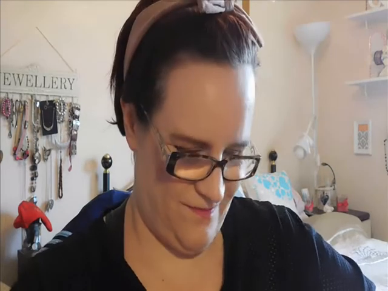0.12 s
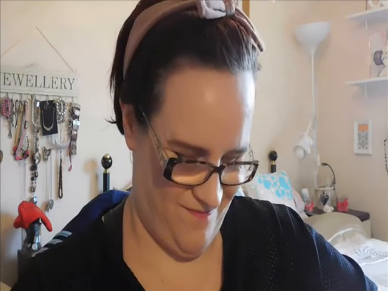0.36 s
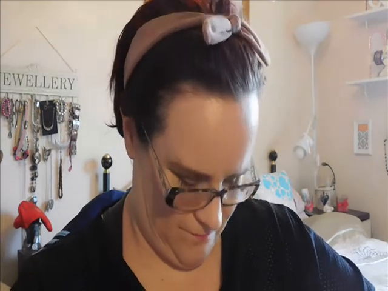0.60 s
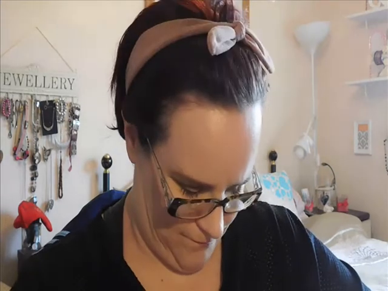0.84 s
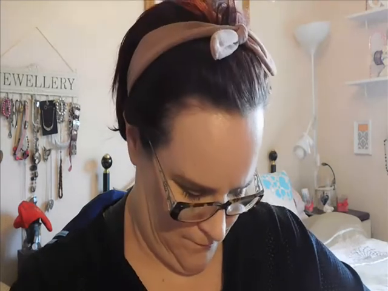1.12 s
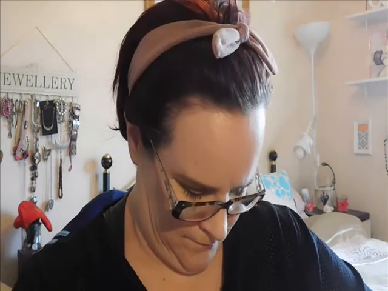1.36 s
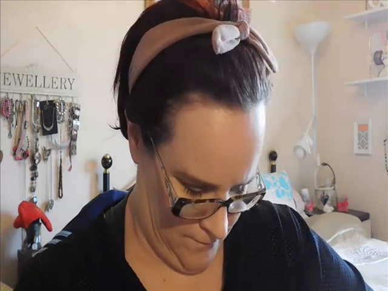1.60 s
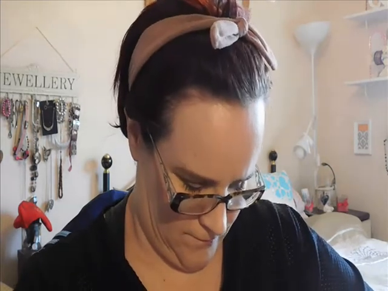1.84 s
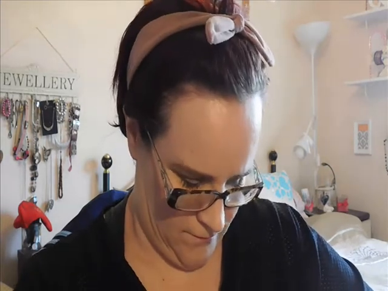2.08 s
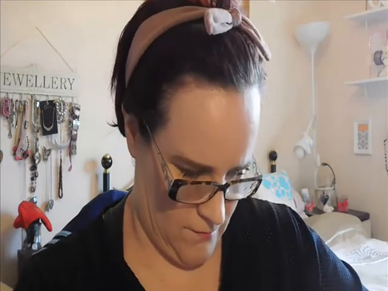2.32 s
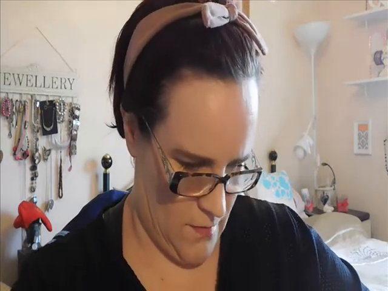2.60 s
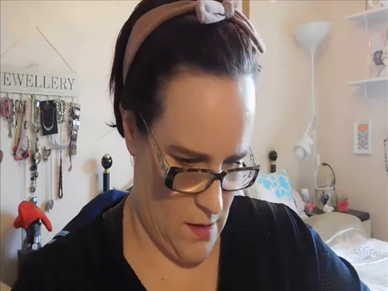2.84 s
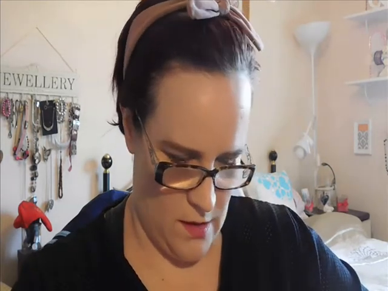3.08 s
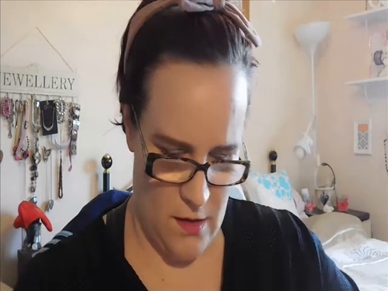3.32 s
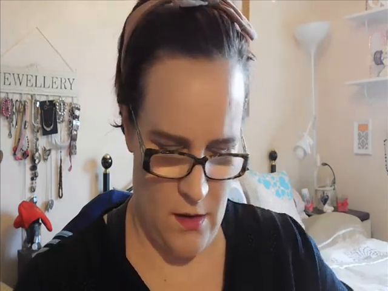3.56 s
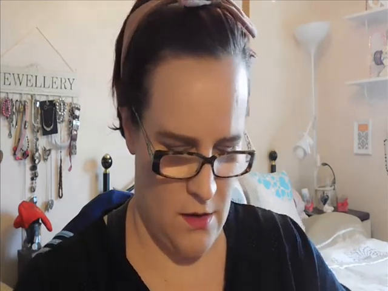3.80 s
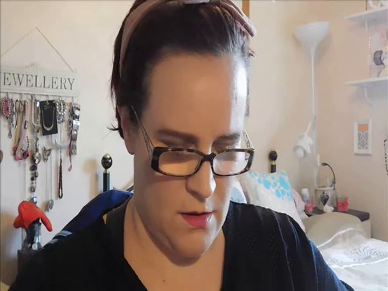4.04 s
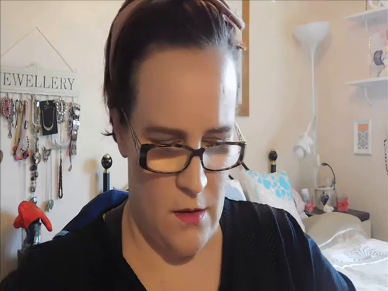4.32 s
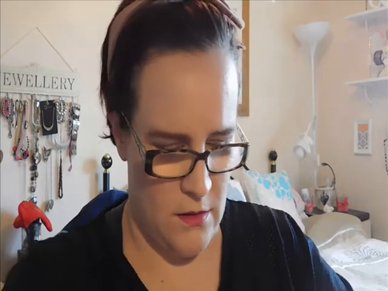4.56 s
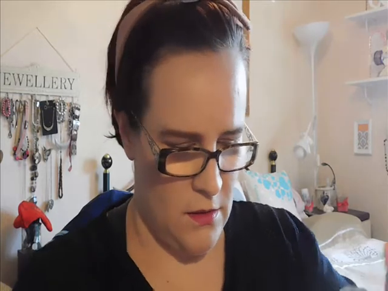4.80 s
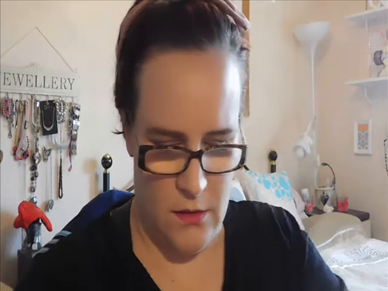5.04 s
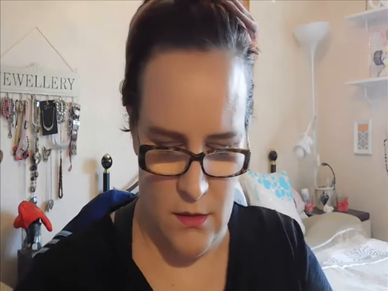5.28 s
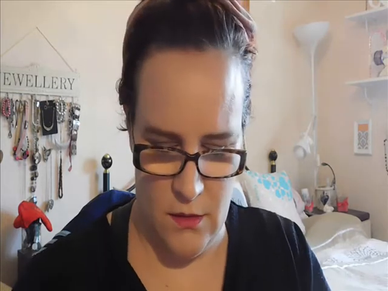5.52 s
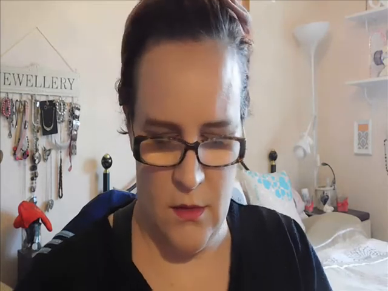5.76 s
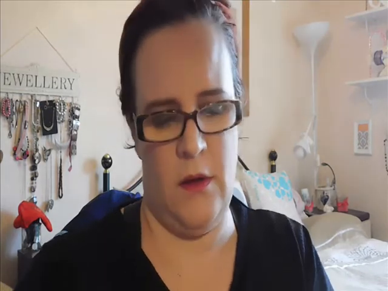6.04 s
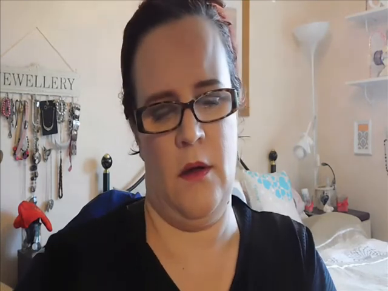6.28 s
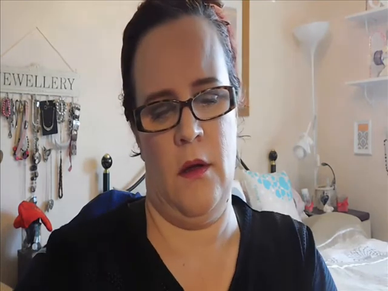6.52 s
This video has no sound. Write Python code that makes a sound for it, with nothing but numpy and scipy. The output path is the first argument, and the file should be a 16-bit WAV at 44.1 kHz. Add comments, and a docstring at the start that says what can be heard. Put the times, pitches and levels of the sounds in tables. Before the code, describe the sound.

Unseen fingers work open a small crisp pack, snapping folds and knocking flaps in uneven bursts, close up in a quiet furnished room.

```python
"""Opening a small card-and-plastic package

Hands out of sight open a small package in a quiet, soft bedroom. Folds snap and flaps knock:
stuttering bursts of slips ring the hollow pack, each at its own pitch, with a thump and a crack.
Between them fingers rustle: clumped tiny slips, all heard through a dull card and a bright foil filter.
First echoes and a short tail answer; filtered noise gives the microphone hiss and the low rumble."""
import sys
import numpy as np
from scipy import signal
from scipy.fft import rfft, irfft
from scipy.io import wavfile
from scipy.ndimage import uniform_filter1d

SR = 44100
rng = np.random.default_rng(int(sys.argv[2]) if len(sys.argv) > 2 else 0)


def natural_amplitude(level_db):
    """Convert a level in decibels to a linear amplitude factor, elementwise."""
    exponent = np.asarray(level_db, float) / 20
    return 10 ** exponent


def wrap_up_sound(samples):
    """Save the sound to the file named by the first command line argument, as 16-bit audio."""
    columns = np.atleast_2d(samples).T
    # keep every value between -1 and 1, then stretch to whole-number steps
    tamed = np.clip(columns, -1, 1)
    steps = np.round(tamed * 32767).astype(np.int16)
    wavfile.write(sys.argv[1], SR, steps)


N = 292824  # length of the scene [samples]
TAPS = 4096  # transform length for filters and snaps [samples]

# Low rumble of the house: (time [s], level [dB])
RUMBLE_LEVEL = [(0.0, -69), (1.0, -67), (1.15, -66), (2.1, -63.5), (2.5, -70), (6.64, -68.5)]
# Colour of the microphone hiss and room air: (frequency [Hz], relative density [dB per Hz])
HISS_COLOUR = [(47, -24), (80, -3), (200, -2), (261, -2.5), (665, -1), (1040, -2), (1860, -2), (2370, -5),
               (3790, -9.5), (6470, -18), (15100, -20.5), (16500, -58)]
# Left-right likeness of the hiss: (frequency [Hz], likeness [0-1])
HISS_LIKENESS = [(60, 0.73), (240, 0.042), (950, 0.044), (3770, 0.022), (15000, 0.022)]
# Decay of the room tail: (frequency [Hz], time to fall 60 dB [s])
ROOM_DECAY = [(250, 0.22), (660, 0.17), (1740, 0.19), (4590, 0.25), (12100, 0.19)]
# Left-right likeness of the room tail: (frequency [Hz], likeness [0-1])
ROOM_LIKENESS = [(100, 0.75), (600, 1), (1500, 0.32), (3000, 0.057), (8000, 0.024)]
# Strength of the room tail: (frequency [Hz], level [dB])
ROOM_STRENGTH = [(150, -16.5), (600, -0.5), (2000, -2.5), (5000, -8), (12000, -3)]
# First echoes off nearby walls:
# (delay [ms], bass [dB], treble [dB], left over right [dB], left lag behind right [samples])
WALL_ECHOES = [(6.012, -26.5, -4.5, 4.5, -2), (12.23, -35, -23, 15, 5), (17.75, -15, -30, -2, 19),
               (25.58, -34.5, -18, 17, 6)]
# Fingers sliding on the pack: (time [s], level [dB])
RUSTLE_LEVEL = [(0.0, -57.5), (0.7, -56), (1.27, -61), (1.45, -61.5), (1.74, -56.5), (1.92, -53),
                (2.12, -47.5), (2.24, -66), (2.31, -36), (2.52, -67), (3.44, -59.5), (4.16, -59.5),
                (4.29, -42.5), (4.46, -102), (4.62, -46), (4.9, -65.5), (5.4, -51), (5.7, -62), (6.64, -62)]
# Colour of the card rustle: (frequency [Hz], relative density [dB per Hz])
CARD_COLOUR = [(120, -53), (200, -10), (369, -55), (459, 0.5), (1390, -3.5), (1580, -0.5), (1860, 3.5),
               (6500, -30), (8450, -53), (14300, -120)]
# Resonances of the hollow pack: (frequency [Hz], width [Hz], level [dB])
PACK_RESONANCES = [(937, 194, 7.5), (1098.4, 42, 8.5), (1360, 147, 6.5), (1920, 580, 2.5), (2287, 37, -13),
                   (2517, 15, -48), (2890, 15, -26), (3290, 51, -65), (3770, 46, 3)]
# Folds giving way: (time [s], ring energy as rms over 1 ms [dB], ring pitch [Hz],
# crack level relative to the ring [dB], stutter length [ms])
FOLD_SNAPS = [(0.001, -24, 1860, -7.5, 4.7), (0.011, -26, 2200, -11, 5.2), (0.034, -30.5, 2260, -24, 16),
              (0.233, -27, 2230, -15, 4.9), (0.316, -38.5, 1080, -13, 5.6), (0.356, -37.5, 1960, -19, 4.5),
              (0.469, -11, 1920, -6.5, 5.5), (0.471, -10, 2930, -35, 3.6), (0.62, -34.5, 2200, -10.5, 5.9),
              (0.658, -34.5, 1180, -14, 9.7), (0.679, -35.5, 2060, -17, 10), (1.04, -19, 767, -33, 5.4),
              (1.285, -12.5, 1930, -20, 3.2), (1.376, -35, 1000, -3, 6.6), (1.388, -11.5, 1250, -8.5, 4.6),
              (1.397, -17.5, 450, -15.5, 3.7), (1.508, -27, 1200, -12.5, 3.3),
              (1.688, -10, 1390, -21.5, 4.6), (1.71, -20.5, 1610, -22, 13), (1.805, -22, 3340, -11, 2.1),
              (1.911, -28, 1490, -21, 5.6), (2.044, -23.5, 3300, 3, 2.8), (2.079, -22.5, 1480, -16, 9.2),
              (2.104, -9, 2740, -11, 6.2), (2.105, -17.5, 900, -42, 2), (2.248, -24, 1750, -10, 14),
              (2.268, -18.5, 1360, -5.5, 8.1), (2.295, -20, 1840, -5, 5.1), (2.307, -20, 2270, -5.5, 10.3),
              (2.337, -21, 1840, -3.5, 4.5), (2.36, -28.5, 2890, -29, 2.6), (2.451, -29.5, 1090, -4, 9.7),
              (2.465, -26.5, 1700, -19, 5.1), (2.498, -29, 1110, -14, 11.3),
              (2.802, -33.5, 1770, -10.5, 7.8), (2.816, -29.5, 1820, -12, 4.9),
              (2.837, -31, 1390, -10.5, 6.8), (2.859, -24.5, 1740, -4.5, 7), (2.912, -15, 940, -8.5, 3.1),
              (2.924, -15, 3100, -2, 4.5), (3.067, -32, 1480, -9.5, 4.3), (3.216, -27, 1660, -30, 6.3),
              (3.271, -32, 1020, -14.5, 4.6), (3.368, -23, 1590, -13, 6.3), (3.606, -11.5, 937, -25.5, 6.5),
              (3.612, -27.5, 197, -14, 8.9), (3.62, -11, 790, -22, 7.5), (3.705, -35, 1850, -15, 3.5),
              (3.751, -37, 610, -33, 3.9), (4.099, -30.5, 598, -3, 4.7), (4.206, -38.5, 2100, -9, 3.2),
              (4.282, -28, 2030, -5, 3.4), (4.324, -22, 1990, -14, 2.6), (4.341, -20.5, 1720, -38, 4.3),
              (4.39, -15, 1760, -13.5, 3.8), (4.494, -29, 890, -18, 4.8), (4.629, -24, 1850, -11.5, 5.9),
              (4.658, -14, 1920, -17.5, 7.7), (4.68, -31, 1840, -8, 9.1), (4.716, -23, 1740, -12.5, 6.2),
              (4.722, -20.5, 1330, -20, 5.2), (4.79, -34, 1860, -8, 12), (5.1, -28.5, 830, -9.5, 9),
              (5.187, -9, 674, -19, 6), (5.277, -28, 460, -18.5, 5.3), (5.327, -39, 1210, -19, 4.3),
              (5.356, -23, 1850, -10, 7.4), (5.369, -22, 815, -8.5, 4.9), (5.384, -24, 546, -9.5, 4.4),
              (5.403, -24.5, 1207, -6.5, 13), (5.468, -26, 2180, -5.5, 8.8), (5.481, -22, 453, -22, 5.7),
              (5.691, -38, 770, -37, 8.1)]
# Low thump under each snap: (time [s], level relative to the ring [dB])
THUMP_LEVEL = [(0.0, -8.5), (1.1, -24.5), (1.4, -16), (2.1, -18), (2.5, -20.5), (3.6, -14.5), (4.4, -30.5),
               (4.72, -5), (5.1, -10), (5.7, -5.5)]

HISS_DB = -53.5
FOIL_DB, FOIL_PER_DB = -13, 0.78  # foil relative to card at a -46.5 dB rustle, rising with level
TICK_COUNT = 36
TICK_DB, TICK_SPREAD_DB = 15, 5  # relative to the rustle around them; spread is plus or minus
TICK_FULL_DB = -54  # above this rustle level the ticks grow no further
TICK_HZ, TICK_OCTAVES = 1540, 0.7  # middle pitch, spread either way
TICK_CRACK_DB, TICK_STUTTER_MS = -11, 4.7  # each stutter lasts 0.5 to 1.5 times this
WALL_DB, WALL_PER_CRACK = -3, 0.61  # the card wall near 2 kHz rings more under snaps that crack more
WALL_DB_PER_OCTAVE = -2.5  # low rings carry more of the wall
EDGE_HZ = 15780  # upper band limit


def evened(x):
    """Scales to rms 1."""
    return x / np.sqrt(np.mean(x ** 2) + 1e-20)


def read(points, hz):
    """Reads a curve on a log-frequency axis."""
    f, value = np.transpose(points)
    return np.interp(np.log(hz + 1), np.log(f + 1), value)


def bell(hz, centre_hz, width_hz):
    """Gain of one resonance."""
    return 1 / np.sqrt(1 + (2 * (hz - centre_hz) / width_hz) ** 2)


def hump(hz, centre_hz, octaves):
    """Gain of a broad resonance with steep skirts."""
    return np.exp(-0.5 * (np.log2((hz + 1) / centre_hz) / octaves) ** 2)


def causal(gain):
    """Minimum-phase impulse response, so the energy comes at once, for a gain on the rfft bins."""
    log_gain = np.log(np.maximum(gain, 1e-5))
    mirrored = np.r_[log_gain, log_gain[-2:0:-1]]
    phase = -signal.hilbert(mirrored).imag[:len(log_gain)]
    return irfft(np.exp(log_gain + 1j * phase))[:TAPS // 2]


def paired(z, likeness):
    """Mixes the second of two spectra towards the first by a likeness per bin."""
    likeness = np.clip(likeness, 0, 1)[:, None]
    return np.array([z[0], likeness * z[0] + np.sqrt(1 - likeness ** 2) * z[1]])


def levelled(x):
    """Evens out the spectrum of a burst, so that it excites all pitches more alike."""
    spectrum = rfft(x, TAPS)
    return irfft(spectrum / abs(spectrum) ** 0.65)[..., :TAPS // 2]


def rumble():
    """Low noise, band-passed from 30 to 75 Hz and largely shared by the ports."""
    s, level_db = np.transpose(RUMBLE_LEVEL)
    a, b = rng.standard_normal((2, N))
    band = signal.butter(2, [30, 75], "band", fs=SR, output="sos")
    low = signal.sosfilt(band, [a, 0.51 * a + 0.75 * b])
    return natural_amplitude(np.interp(np.arange(N) / SR, s, level_db)) * evened(low)


def hiss():
    """Microphone hiss and room air: faintly patchy noise, nearly unrelated in the two ports."""
    frames, hz = N // 256 + 5, np.fft.rfftfreq(1024, 1 / SR)
    a, b, c, d, patches = rng.standard_normal((frames, 513, 5)).T
    patches = uniform_filter1d(patches, size=14, axis=0)
    patches = evened(uniform_filter1d(patches, size=12, axis=1))
    z = paired([a + 1j * b, c + 1j * d], read(HISS_LIKENESS, hz))
    z = z * natural_amplitude(read(HISS_COLOUR, hz)[:, None] + 1.06 * patches)
    noise = signal.istft(z, nperseg=1024, noverlap=768)[1][:, :N]
    return natural_amplitude(HISS_DB) * evened(noise)


def room(x):
    """Sparse late echoes, each band dying at its own speed; three tails take turns."""
    out, turns = np.zeros((2, N)), np.arange(N) / SR * 1.688
    size = SR // 2
    for k in range(3):
        taps = rng.standard_normal((2, size)) * (rng.random((2, size)) < 0.07)
        taps *= np.tanh((np.arange(size) / SR / 0.011) ** 2)  # the tail builds up
        hz, t, z = signal.stft(taps, SR, nperseg=128)
        t60 = np.clip(read(ROOM_DECAY, hz), 0.05, 1)[:, None]
        z = paired(z, read(ROOM_LIKENESS, hz)) * natural_amplitude(-60 * t / t60)
        norm = np.linalg.norm(signal.istft(z[0], SR, nperseg=128)[1])
        z *= natural_amplitude(read(ROOM_STRENGTH, hz))[:, None] / norm
        tail = signal.istft(z, SR, nperseg=128)[1]
        window = np.sqrt(2 / 3) * np.cos(np.pi * (turns + k / 3))  # the three powers add up to 1
        out += signal.oaconvolve((x * window)[None], tail, axes=1)[:, :N]
    return out


def echoes(x):
    """Single reflections, each from its own side and with its own share of treble."""
    hz, out = np.fft.rfftfreq(TAPS, 1 / SR), np.zeros((2, TAPS // 2 + 1), complex)
    way = np.array([[0.5], [-0.5]])  # left and right each take half of the difference
    high = np.tanh((hz / 3000) ** 2)
    for ms, bass_db, treble_db, side_db, lag in WALL_ECHOES:
        delay = np.exp(-2j * np.pi * hz * (ms / 1000 + way * lag / SR))
        out += natural_amplitude(bass_db + high * (treble_db - bass_db) + way * side_db) * delay
    return signal.oaconvolve(x[None], irfft(out), axes=1)[:, :N]


def pack(hz):
    """Gain of the hollow pack: resonances over a flat wall, added in power."""
    hollows = sum((natural_amplitude(db) * bell(hz, f, width)) ** 2 for f, width, db in PACK_RESONANCES)
    return np.sqrt(natural_amplitude(-0.5) ** 2 + hollows)


def rustle_db(s):
    """Level of the fingers' rustle at time s."""
    return np.interp(s, *np.transpose(RUSTLE_LEVEL))


def rustle():
    """Clumped tiny slips, all heard through both a dull card and a bright foil filter, more foil when louder."""
    level_db, hz = rustle_db(np.arange(N) / SR), np.fft.rfftfreq(TAPS, 1 / SR)
    foil_db = FOIL_DB + FOIL_PER_DB * (level_db + 46.5)
    clumps = evened(uniform_filter1d(rng.standard_normal(N), size=500))
    size = natural_amplitude(3.5 * np.minimum(rng.exponential(1, N), 3) + 3.5 * clumps)
    slips = size * rng.standard_normal(N) * (rng.random(N) < 3500 / SR)  # about 3500 a second
    card_filter = causal(natural_amplitude(read(CARD_COLOUR, hz)) * pack(hz) ** 0.6)
    foil_filter = causal(np.tanh((hz / 4000) ** 4) * bell(hz, 4000, 18000))
    card = evened(signal.oaconvolve(slips, card_filter)[:N])
    foil = evened(signal.oaconvolve(slips, foil_filter)[:N])
    sound = natural_amplitude(level_db) * (card + natural_amplitude(foil_db) * foil)
    return np.array([np.roll(sound, 1) * natural_amplitude(0.7), sound * natural_amplitude(-0.7)])  # left a sample late, louder


def ticks():
    """Small folds give way at random moments, harder as the rustle grows, up to a limit."""
    when, size, pitch, length = rng.random((TICK_COUNT, 4)).T
    s = (np.arange(TICK_COUNT) + when) / TICK_COUNT * FOLD_SNAPS[-1][0]
    db = np.minimum(rustle_db(s), TICK_FULL_DB) + TICK_DB + TICK_SPREAD_DB * (2 * size - 1)
    ring_hz = TICK_HZ * 2 ** (TICK_OCTAVES * (2 * pitch - 1))
    return list(zip(s, db, ring_hz, TICK_CRACK_DB + 0 * s, TICK_STUTTER_MS * (0.5 + length)))


def filtered(drive, gains):
    """Sends bursts through the filters with these gains."""
    return signal.fftconvolve(drive, [causal(gain) for gain in gains], axes=1)


def unit(x):
    """Scales so that the first row has the energy of rms 1 over 1 ms."""
    return x / np.linalg.norm(x[0]) * np.sqrt(SR / 1000)


def snap(ring_hz, thump_db, wall_db, crack_db, stutter_ms, chance, hz):
    """A fold gives way in a stutter of slips that ring the pack, thump the air and crack: left, right, room."""
    ms = 1000 * np.arange(chance.shape[1]) / SR
    stutter_ms = np.clip(stutter_ms, 0.3, 40)
    onset = np.tanh((ms + 0.32) / (0.077 * stutter_ms ** 2))  # long crumples start softly
    swell = np.exp(-ms / stutter_ms) * onset
    slips = chance[0] * (chance[1] > 1.6) * swell
    slips[0] = 6.7 / stutter_ms  # the first slip
    slips = levelled(slips)

    flurry = 0.35 + 0.086 * evened(uniform_filter1d(abs(slips), size=60))
    fizz = levelled(chance[2:] * flurry * swell * np.tanh(0.88 + ms / 0.92))
    fizz[1] = 0.33 * fizz[0] + 0.89 * fizz[1]  # the treble reaches each port by its own path

    pure = np.array([[1], [1], [0.45]]) * hump(hz, ring_hz, 0.11)  # the pure ring beams at the ports
    rings = (pure + natural_amplitude(-5.0) * hump(hz, ring_hz, 0.69)) * pack(hz)
    low_hz = 400 * (ring_hz / 900) ** 0.68  # higher rings thump higher: stiffer folds
    air = hump(hz, low_hz, 0.65) + 0.18 * hump(hz, 0.232 * low_hz, 0.3)
    ring = unit(filtered(slips[None], rings))
    thump = unit(filtered(slips[None], [air]))
    wall = unit(filtered(slips[None], [hump(hz, 2134, 0.44) * pack(hz)]))
    crack = unit(filtered(fizz, [np.tanh((hz / 3300) ** 4) * bell(hz, 2000, 5100)]))
    return ring + natural_amplitude(thump_db) * thump + natural_amplitude(wall_db) * wall + natural_amplitude(crack_db) * crack


def snaps():
    """Snaps and ticks each come from their own spot, heard a little apart by the ports: left, right, room."""
    hz, out = np.fft.rfftfreq(TAPS, 1 / SR), np.zeros((3, N + 2 * TAPS))
    rows = FOLD_SNAPS + ticks()
    chance = rng.standard_normal((len(rows), 5, TAPS // 2))
    spot = rng.standard_normal((len(rows), 2))
    for (s, db, ring_hz, crack_db, stutter_ms), c, (side, lag) in zip(rows, chance, spot):
        thump_db = np.interp(s, *np.transpose(THUMP_LEVEL))
        wall_db = WALL_DB + WALL_PER_CRACK * crack_db + WALL_DB_PER_OCTAVE * np.log2(ring_hz / 2000)
        sound = natural_amplitude(db) * snap(ring_hz, thump_db, wall_db, crack_db, stutter_ms, c, hz)
        turn = np.exp(-1j * np.pi * hz / SR * (2.24 + 1.46 * lag))  # half the lag in samples to each port
        for ear, way in enumerate((1, -1, 0)):
            heard = irfft(rfft(sound[ear], TAPS) * turn ** way) * natural_amplitude(way * (0.5 + 1.04 * side))
            out[ear, round(s * SR):][:TAPS] += np.roll(heard, 8)  # leaves room for an early arrival
    return out[:, :N]


def scene():
    """The pack, heard directly and through the room, over hiss and rumble."""
    folds, fingers = snaps(), rustle()
    sent = folds[2] + fingers[1]
    return folds[:2] + fingers + echoes(sent) + room(sent) + hiss() + rumble()


def low_pass(x):
    """Removes everything above the highest recorded frequency."""
    return signal.sosfilt(signal.butter(12, 16670, fs=SR, output="sos"), x)


def record(dry):
    """Limits the band with a linear-phase low-pass and returns the finished mix."""
    edge = signal.firwin(301, EDGE_HZ, window=("kaiser", 2.5), fs=SR)
    mix = signal.oaconvolve(dry, edge[None], "same", axes=1)
    return low_pass(mix)


dry = scene()
out = record(dry)
wrap_up_sound(out)
```